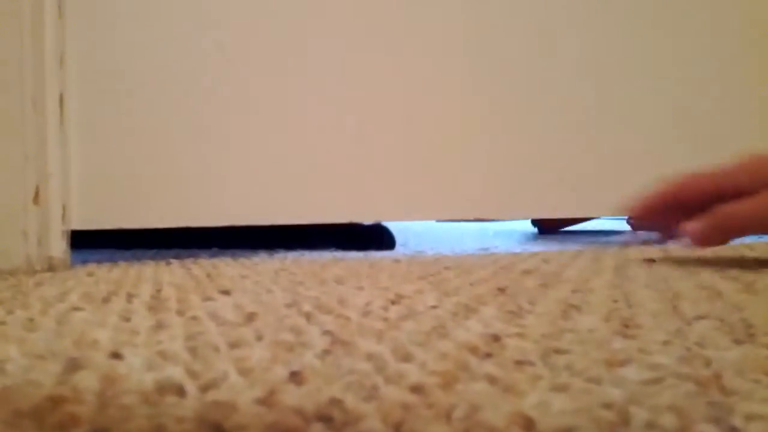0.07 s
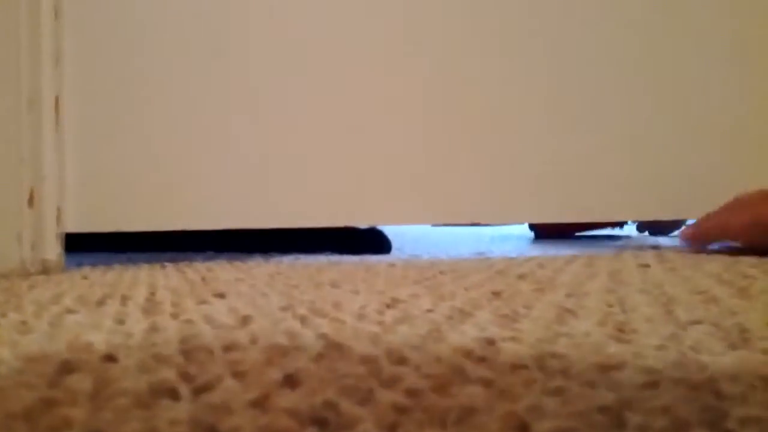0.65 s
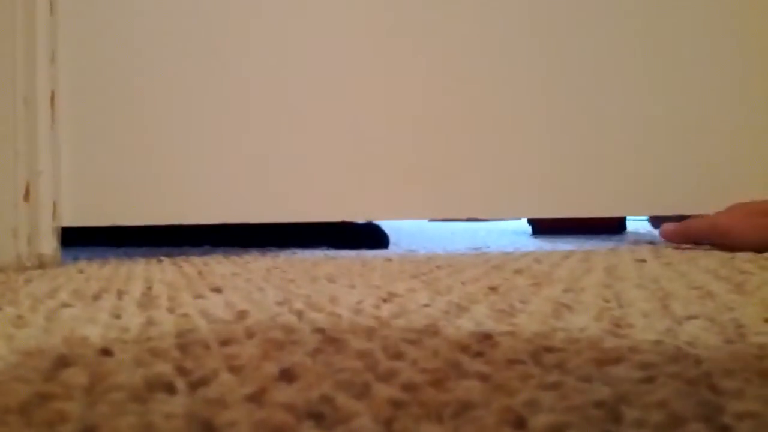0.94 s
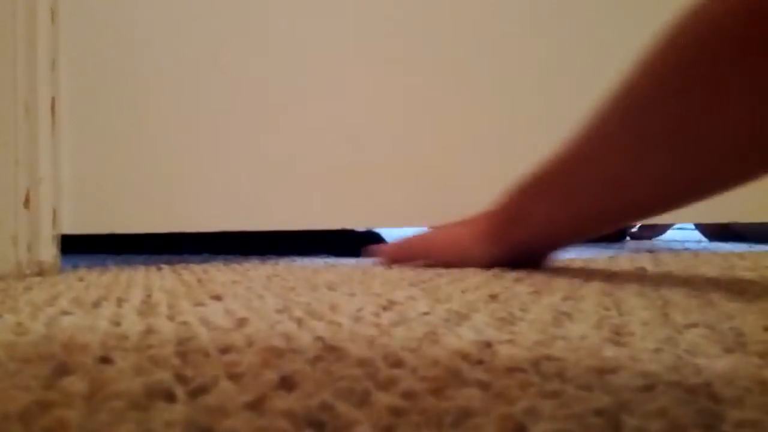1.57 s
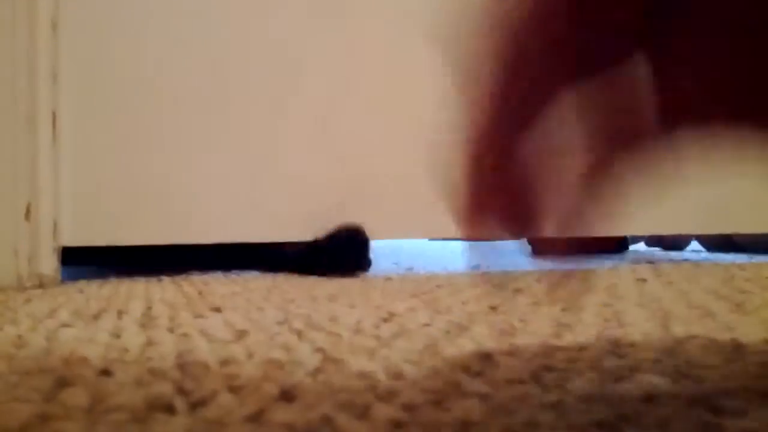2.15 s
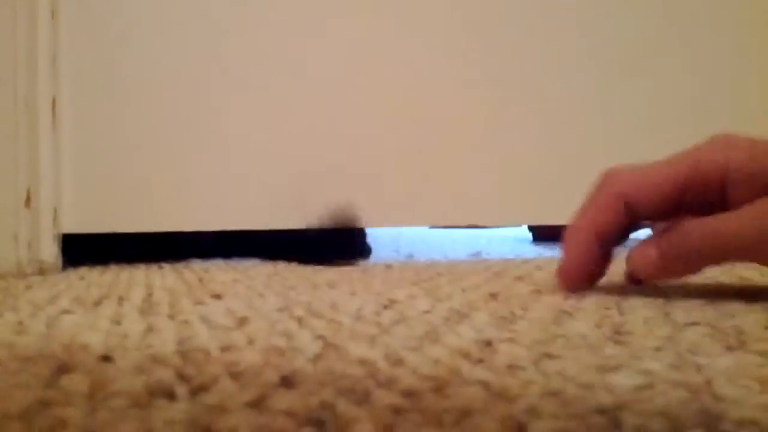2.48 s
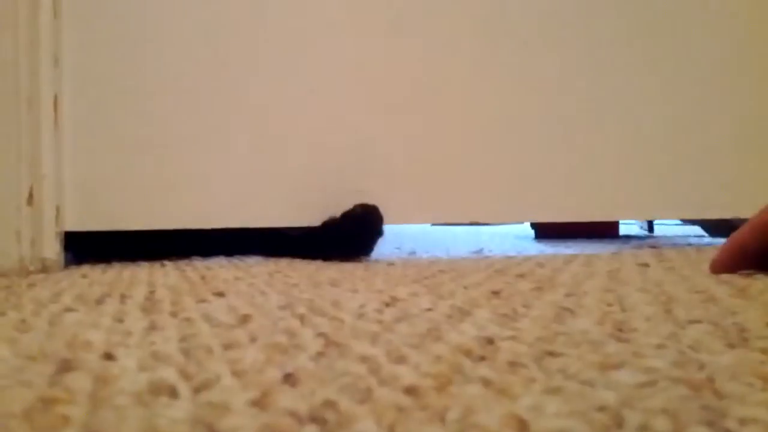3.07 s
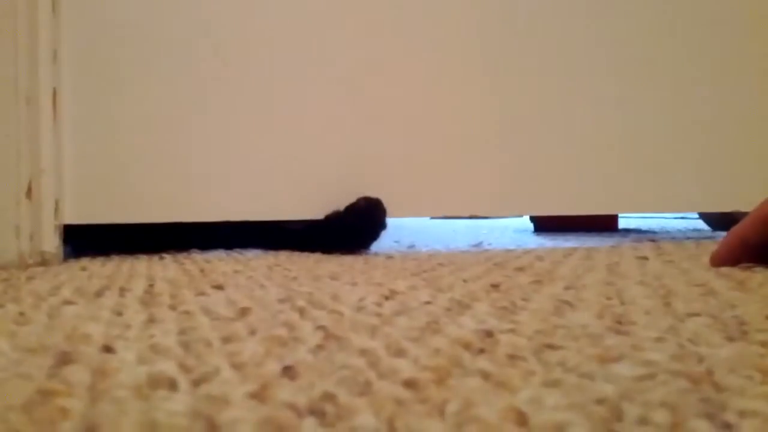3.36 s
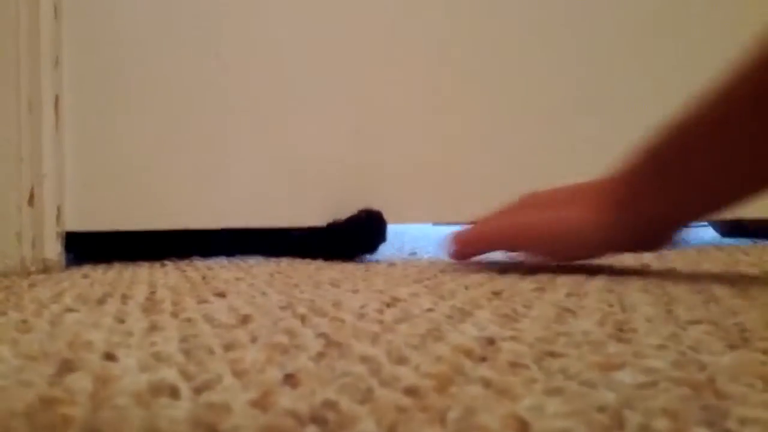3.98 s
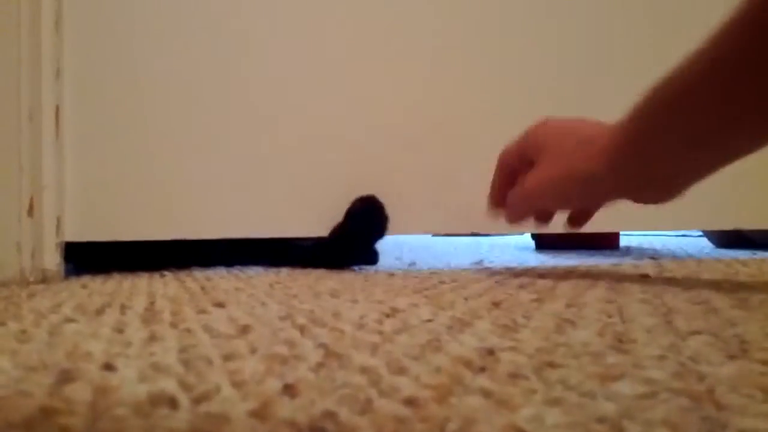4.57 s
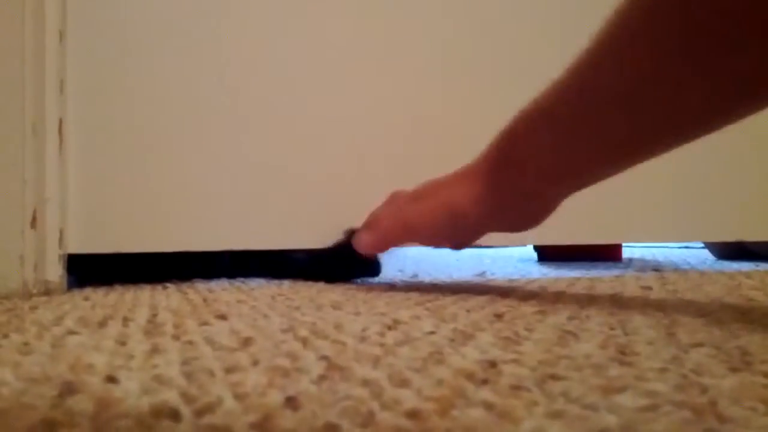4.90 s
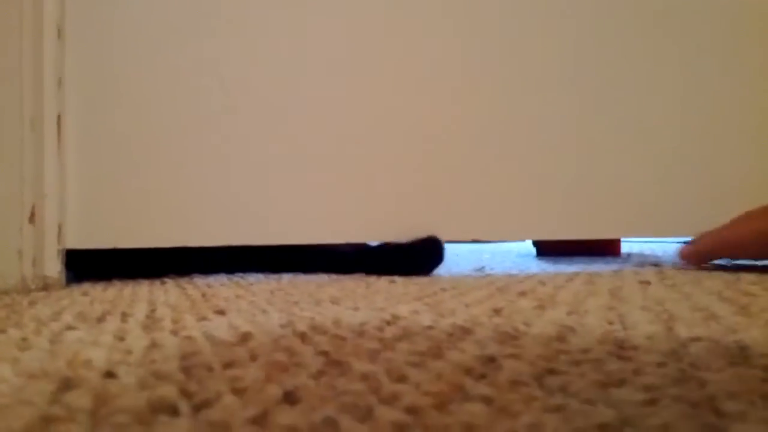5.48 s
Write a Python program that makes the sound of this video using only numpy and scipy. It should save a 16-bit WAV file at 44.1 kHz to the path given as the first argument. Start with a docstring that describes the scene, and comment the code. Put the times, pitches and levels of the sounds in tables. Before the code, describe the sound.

A door rattles briefly, then a hand pats and brushes carpet while a cat's paw scuffs the door and claws pluck the pile.

```python
"""A closed door bumps and rattles in its latch, heard from the carpet close by: a hand is teasing a cat
that reaches under it. The hand pats the padded floor into soft thuds and strokes the pile, whose fibres
snap back in a rustle. Claws pluck and tick, and a paw scuffs the door's edge by stick-slip friction.
Faint hollow tones come and go, and movements rumble through the floor over a hum and microphone hiss."""
import sys
import numpy as np
from scipy import signal
from scipy.fft import rfft, irfft, next_fast_len
from scipy.io import wavfile

SR = 44100
rng = np.random.default_rng(int(sys.argv[2]) if len(sys.argv) > 2 else 0)


def digitize_waveform(pressure):
    """Quantize a signal to 16-bit integers and store it at the path in sys.argv[1].

    Rows of a 2-D input are taken as channels; values are limited to [-1, 1].
    """
    field = np.atleast_2d(pressure).T
    bounded = np.clip(field, -1, 1)
    quanta = np.round(bounded * 32767).astype(np.int16)
    wavfile.write(sys.argv[1], SR, quanta)


N = 253134
TIME = np.arange(N) / SR


# bumps of the door in its latch: start_s, strength_db, rattle_db
DOOR_BUMPS = [(0.0005, -31, -39.5), (0.0131, -31, -74), (0.0291, -27, -68), (0.0406, -18.5, -34),
              (0.0478, -22.5, -47.5), (0.0523, -25, -50), (0.0738, -23, -58), (0.1767, -28.5, -39),
              (0.1885, -26, -52), (0.215, -43, -79), (0.2513, -32, -53), (0.2788, -30, -48.5),
              (0.3272, -38, -57)]
# modes of the door panel: pitch_hz, gain_db, t60_s
PANEL_MODES = [(176.5, -20.5, 0.44), (198, -38, 0.42), (255.8, -3.5, 0.14), (280.6, -3.5, 0.32),
               (325, -10.5, 0.15), (395.6, -17.5, 0.26), (436.2, -11, 0.18), (456, -17, 0.25),
               (520, -24.5, 0.51), (672, -24.5, 0.27), (750, -28, 0.26), (856, -31, 0.2)]
# spectrum of the latch's rattle: frequency_hz, density_db
RATTLE_SPECTRUM = [(330, -1.5), (450, 13), (650, 3), (880, -6), (1050, -8), (1400, -10.5), (2400, -8),
                   (3000, -18), (5400, -30.5), (8000, -18.5), (12500, -21.5), (15000, -44)]

def door_bumps():
    """Impact excitation: each bump rings the panel's modes and makes the latch rattle."""
    blows = sum(click(s, db) for s, db, _ in DOOR_BUMPS)
    shaking = sum(amp(db) * burst(s, t60=0.21, rise_s=0.00065) for s, _, db in DOOR_BUMPS)
    panel = highpass(-ring(lowpass(blows, hz=600), PANEL_MODES), hz=205, order=4)
    rattle = shaking * wood_friction(RATTLE_SPECTRUM, hollow_db=-2)
    return room(panel, wet_db=-14) + rattle


# pats, dull knocks and footfalls, each with its own pitch: start_s, strength_db, pitch_hz, t60_s, slap_db
CARPET_PATS = [(0.6001, -33, 103, 0.041, -25), (0.631, -36.5, 152, 0.081, -25),
               (0.675, -36, 110, 0.026, -20), (0.859, -41, 148, 0.085, -14), (1.026, -43.5, 170, 0.13, -14),
               (1.036, -46, 560, 0.18, 2), (1.4619, -10, 304, 0.023, -4.5), (1.4767, -35.5, 316, 0.05, -15),
               (1.4828, -31.5, 242, 0.084, -11), (1.521, -33, 290, 0.033, -25),
               (2.179, -38, 219, 0.065, -24), (2.7927, -35, 430, 0.12, -17),
               (2.8077, -38.5, 307, 0.095, -13), (2.931, -40, 175, 0.032, -30),
               (4.1908, -38, 208, 0.12, -18), (4.221, -40.5, 225, 0.15, -8),
               (4.236, -35.5, 125, 0.062, -22), (4.255, -31, 56.5, 0.15, -20), (4.296, -43, 90, 0.03, -25),
               (5.4461, -30.5, 192, 0.13, -1), (5.458, -39.5, 282, 0.11, -23), (5.501, -46, 122, .07, -14),
               (5.578, -36, 60, 0.14, -22), (5.606, -39, 85, 0.13, -24)]
# overtones of a slap, relative to its thud: pitch_ratio, gain_db, t60_ratio
SLAP_OVERTONES = [(2.05, -13.5, 1), (3.1, -6, 0.25), (5.5, -28, 0.89)]

def carpet_pats():
    """Damped oscillation: a pat bounces the padded floor; a flat contact adds a slap of overtones."""
    out = np.zeros(N)
    for s, db, hz, t60, slap_db in CARPET_PATS:
        overtones = [(hz * pitch_ratio, slap_db + gain_db, t60 * t60_ratio)
                     for pitch_ratio, gain_db, t60_ratio in SLAP_OVERTONES]
        bounce = ring(click(s, db), [(hz, 0, t60)] + overtones)
        out -= highpass(bounce, hz=0.53 * hz)   # the floor springs back: little sounds below the thud
    return room(lowpass(out, hz=1500, order=3), wet_db=-12)


# the palm slides toward the door, presses down and lifts: time_s, brush_db, scrape_db
PALM_STROKE = [(1.13, -72.5, -64.5), (1.24, -63, -65), (1.42, -61.5, -68), (1.55, -56, -57),
               (1.8, -53.5, -54), (1.858, -51.5, -55.5), (1.885, -51, -42.5), (1.915, -50.5, -38.5),
               (1.97, -63.5, -56)]
# swipes of hand or paw over the pile: peak_s, length_s, brush_db, scrape_db
PILE_SWIPES = [(0.554, 0.77, -77, -69), (2.198, 0.14, -71, -60), (2.31, 0.27, -70.5, -56.5),
               (2.461, 0.18, -61.5, -60), (2.725, 0.54, -86, -59), (2.878, 0.19, -65, -62),
               (3.684, 0.11, -62, -68), (3.955, 0.055, -65.5, -58), (4.067, 0.12, -70.5, -69),
               (4.77, 0.12, -65.5, -66), (5.45, 1.3, -74, -67)]

def pile_contact():
    """Incoherent addition: stroke and swipes sum in power, giving a brushing and a scraping envelope."""
    times, *levels = np.transpose(PALM_STROKE)
    palm_db = np.array([np.interp(TIME, times, level) for level in levels])
    beyond_s = np.abs(TIME - np.clip(TIME, times[0], times[-1]))
    palm = amp(palm_db - 200 * beyond_s)   # fades 200 dB/s beyond either end
    swipes = [amp([[brush_db], [scrape_db]]) * swell(s, length_s)
              for s, length_s, brush_db, scrape_db in PILE_SWIPES]
    return np.sqrt(palm ** 2 + sum(swipe ** 2 for swipe in swipes))


# spectra of brushed tips, dragged loops and raking fingernails: frequency_hz, density_db
BRUSH_SPECTRUM = [(300, -7), (700, -4.5), (1500, -2.5), (2300, 1), (2900, -2), (3700, -1.5), (4600, -6.5),
                  (6000, -10), (11000, -17), (16000, -31)]
SCRAPE_SPECTRUM = [(70, -9.5), (180, 7), (350, 1.5), (650, -3), (1100, -13.5), (2500, -37), (5000, -25.5),
                   (9000, -20.5), (12500, -17), (16000, -26.5)]
NAIL_SPECTRUM = [(200, 7.5), (600, -7), (1300, -2), (2400, -0.5), (4200, -3), (6000, -9), (11000, -10),
                 (15500, -16)]

def carpet_strokes():
    """Sliding friction: a light touch brushes fibre tips, pressure drags loops, and nails rake once."""
    brushing, scraping = pile_contact()
    catching = rms_one(lowpass(rng.standard_normal(N), hz=29.8))   # the hand catches on rows of loops
    grip = amp(1.1 * catching)   # 1.1 dB rms
    tips = brushing * coloured(fibres(per_s=9000, spread_db=3), BRUSH_SPECTRUM)
    loops = scraping * coloured(fibres(per_s=8300, spread_db=4.5), SCRAPE_SPECTRUM)
    rake = amp(-42.5) * swell(peak_s=2.242, length_s=0.056)
    nails = rake * coloured(fibres(per_s=2600, spread_db=3), NAIL_SPECTRUM)
    # the palm whisks off the ribbed pile with a short, narrow rasp
    rasp_hz, rasp_t60_s = 3080, 0.0021
    rasp = ring(fibres(per_s=9000, spread_db=0), [(rasp_hz, 0, rasp_t60_s)])
    whisk = amp(-49.5) * swell(peak_s=1.853, length_s=0.095) * rms_one(highpass(rasp, hz=1800))
    return grip * (tips + loops + whisk) + nails


# a paw scuffs the door's edge: start_s, strength_db, t60_s, cutoff_hz
PAW_SCUFFS = [(0.772, -47.5, 0.19, 6000), (1.033, -43.5, 0.2, 1050), (2.774, -46, 0.095, 4000),
              (2.791, -37, 0.21, 3950), (2.798, -38, 0.034, 4500), (2.807, -39.5, 0.22, 497),
              (2.854, -40.5, 0.063, 4000), (3.413, -50.5, 0.23, 4000), (3.481, -52.5, 0.4, 6000),
              (4.187, -45, 0.32, 600), (5.402, -45.5, 0.18, 1500), (5.4465, -40, 0.14, 450)]
# fur rubs softly along the wood: peak_s, length_s, strength_db
FUR_RUBS = [(0.38, 0.74, -58.5), (2.733, 0.42, -60.5), (3.113, 0.21, -64), (3.78, 0.5, -65.5),
            (4.124, 0.18, -64.5), (4.462, 0.13, -61.5), (4.93, 0.18, -66), (5.29, 0.31, -67),
            (5.72, 0.12, -62.5)]
# spectrum of dry friction on the door's edge: frequency_hz, density_db
SCUFF_SPECTRUM = [(100, -30), (200, -5.5), (400, 0), (800, -10), (1100, -14), (2600, -12), (3400, -23.5),
                  (11500, -17), (15000, -13.5)]

def paw_scuffs():
    """Stick-slip friction: the paw catches on the wood in short runs and rubs along it in between."""
    wood = wood_friction(SCUFF_SPECTRUM, hollow_db=-2.5)
    rubbing = sum(amp(db) * swell(s, length_s) for s, length_s, db in FUR_RUBS)
    runs = sum(lowpass(wood * amp(db) * burst(s, t60, rise_s=0.0036), hz, order=1)
               for s, db, t60, hz in PAW_SCUFFS)
    return runs + lowpass(wood * rubbing, hz=2950, order=1)


# modes of rubbed wood: pitch_hz, gain_db, t60_s
WOOD_MODES = [(290, 0.5, 0.065), (372, -4, 0.061), (424.4, 0, 0.059), (541.5, -8.5, .1), (610, -6, 0.049),
              (846, -6, 0.058), (1330, -4, 0.022), (1402, -14, 0.13), (1564, -4, 0.026),
              (1762, -11.5, 0.048), (2038, -11, 0.044), (2374, -11, 0.024), (2640, -19, 0.099)]

def wood_friction(spectrum, hollow_db):
    """Frictional excitation: tiny slips sound as dry grains and ring the wood's modes; rms 1."""
    grains = coloured(fibres(per_s=3000, spread_db=3), spectrum)
    hollow = rms_one(highpass(ring(fibres(per_s=2000, spread_db=2), WOOD_MODES), hz=225))
    return rms_one(grains + amp(hollow_db) * hollow)


# claws rip free of carpet loops: start_s, strength_db, t60_s
LOOP_PLUCKS = [(0.642, -52, 0.047), (2.0735, -34.5, 0.032), (2.084, -45.5, .14), (2.3398, -36, 0.048),
               (2.351, -44.5, 0.14), (3.483, -54.5, 0.22)]
# claws pick through the pile: peak_s, length_s, strength_db
PICKING_RUNS = [(0.633, 0.025, -56), (0.725, 0.17, -61.5), (4.096, 0.1, -60), (5.549, 0.082, -60)]
# spectrum of a released loop's crackle: frequency_hz, density_db
PLUCK_SPECTRUM = [(600, -24), (1350, -6), (2000, -12.5), (4800, -12), (6500, -8), (8200, -2), (11000, -4),
                  (15500, -10.5)]

def claw_plucks():
    """Sudden release of tension: freed loops spray fine crackle, singly or in runs of tiny snaps."""
    spray = coloured(fibres(per_s=11000, spread_db=6), PLUCK_SPECTRUM)
    plucks = sum(amp(db) * burst(s, t60, rise_s=0.00038) for s, db, t60 in LOOP_PLUCKS)
    releases = np.abs(fibres(per_s=140, spread_db=1))
    snaps = rms_one(signal.lfilter([1], [1, -decay_per_sample(t60=0.013)], releases + 1e-18))
    runs = snaps * sum(amp(db) * swell(s, length_s) for s, length_s, db in PICKING_RUNS)
    return lowpass(spray * (plucks + runs), hz=14500, order=3)


# single taps of a claw tip: start_s, strength_db
CLAW_TAPS = [(0.1912, -49.5), (0.816, -40), (1.812, -47.5), (2.918, -54), (3.312, -46.5), (4.8652, -49.5),
             (5.138, -55), (5.611, -52.5)]
# modes of a claw's tick: pitch_hz, gain_db, t60_s
CLAW_MODES = [(5000, -9, 0.0033), (8700, 5, 0.00067), (10720, 4.5, 0.0046), (10650, 0.5, 0.0021),
              (13400, -37, .003)]

def claw_ticks():
    """Impulse response: a tapping claw tip rings high modes that die within milliseconds."""
    taps = sum(click(s, db) for s, db in CLAW_TAPS)
    return highpass(ring(taps, CLAW_MODES), hz=6000)


# shifts of weight shake the floor: start_s, level_db
WEIGHT_SHIFTS = [(0.59, -44), (0.88, -51.5), (1.11, -46.5), (1.85, -52.5), (2.08, -47.5), (2.43, -55),
                 (4.16, -43), (4.29, -49.5), (5.47, -46), (5.7, -45)]
# spectrum of the floor's vibration: frequency_hz, density_db
RUMBLE_SPECTRUM = [(20, -17), (37, 4), (60, -1), (95, -1.5), (140, -14.5), (220, -11), (330, -31),
                   (700, -49.5)]

def floor_rumble():
    """Structure-borne sound: the floor carries shifts of weight to the microphone lying on it."""
    resting_power = amp(-63) ** 2
    moving_power = sum((amp(db) * burst(s, t60=1, rise_s=0.016)) ** 2 for s, db in WEIGHT_SHIFTS)
    return np.sqrt(resting_power + moving_power) * coloured(rng.standard_normal(N), RUMBLE_SPECTRUM)


# faint hollow tones: peak_s, half_length_s, pitch_hz, level_db
HOLLOW_TONES = [(3.524, 0.022, 1290, -65.5), (3.886, 0.073, 760, -70), (4.475, 0.11, 542, -70),
                (4.936, 0.016, 1330, -70), (5.236, 0.064, 1310, -70.5), (5.341, 0.019, 545, -61.5),
                (5.419, 0.017, 610, -54.5), (5.557, .045, 767, -67)]

def hollow_tones(t60=0.04):
    """Narrow-band resonance: noise drives one mode for each tone, which swells softly and fades."""
    out = np.zeros(N)
    for peak_s, half_length_s, hz, db in HOLLOW_TONES:
        tone = rms_one(ring(rng.standard_normal(N), [(hz, 0, t60)]))
        out += amp(db) * tone / (1 + ((TIME - peak_s) / half_length_s) ** 4)
    return out


# partials of a distant appliance's hum: pitch_hz, rms_db
HUM_PARTIALS = [(59.6, -64.5), (119, -70), (301.5, -79), (430.7, -94)]
# spectrum of the microphone's hiss: frequency_hz, density_db
HISS_SPECTRUM = [(20, -4), (40, -3.5), (72, -11.5), (123, -11.5), (170, -36), (300, -20), (620, -19.5),
                 (1100, -27.5), (2800, -30.5), (6200, -31), (8000, -29), (11900, -24), (16000, -32.5)]

def hum_and_hiss():
    """Noise floor: an appliance's steady partials lie over the microphone's broadband self-noise."""
    hum = sum(amp(db) * np.sqrt(2) * np.sin(2 * np.pi * (hz * TIME + rng.random()))
              for hz, db in HUM_PARTIALS)
    return hum + amp(-64) * coloured(rng.standard_normal(N), HISS_SPECTRUM)


def room(x, wet_db):
    """Reverberation: the diffuse reflections of a small room follow a few milliseconds late."""
    tail = rng.standard_normal(N) * burst(0.0033, t60=0.29, rise_s=0.0014)
    response = tail[:SR // 2] / np.sqrt(np.sum(tail ** 2))
    return x + amp(wet_db) * signal.fftconvolve(x, response)[:N]


def ring(x, modes):
    """Modal superposition: a unit impulse starts each mode as a damped sine at its own level."""
    out = np.zeros(N)
    for hz, db, t60 in modes:
        radius, angle = decay_per_sample(t60), 2 * np.pi * hz / SR
        feedback = [1, -2 * radius * np.cos(angle), radius ** 2]
        out += amp(db) * signal.lfilter([0, np.sin(angle)], feedback, x + 1e-18)
    return out


def fibres(per_s, spread_db):
    """Shot noise: fibres snap back at random moments, with uneven strength."""
    sizes = amp(spread_db * np.minimum(rng.exponential(1, N), 4)) * rng.choice([-1, 1], N)
    return sizes * (rng.random(N) < per_s / SR)


def coloured(x, spectrum):
    """Spectral shaping: a steady excitation takes on a spectrum's relative levels; rms 1."""
    size = next_fast_len(N)
    hz, db = np.transpose(spectrum)
    bins_hz = np.maximum(np.fft.rfftfreq(size, 1 / SR), 1)
    gain = amp(np.interp(np.log(bins_hz), np.log(hz), db)) * (bins_hz > 10)
    return rms_one(irfft(rfft(x, size) * gain, size)[:N])


def click(start_s, db):
    """An ideal impact: one impulse."""
    return amp(db) * (np.arange(N) == max(round(start_s * SR), 0))


def burst(start_s, t60, rise_s):
    """A transient's envelope: quick rise, exponential decay."""
    age = np.maximum(TIME - start_s, 0)
    return (1 - np.exp(-age / rise_s)) * np.exp(-np.minimum(np.log(1000) * age / t60, 100))


def swell(peak_s, length_s, edge_db=13.5):
    """A Gaussian envelope: a sliding contact speeds up and slows, edge_db down at either end."""
    return amp(-np.minimum(edge_db * (2 * (TIME - peak_s) / length_s) ** 2, 200))


def lowpass(x, hz, order=2):
    """Treble roll-off, as from a soft contact."""
    return signal.sosfilt(signal.butter(order, hz, fs=SR, output="sos"), x + 1e-18)


def highpass(x, hz, order=2):
    """Bass roll-off, as from a small radiating surface."""
    return signal.sosfilt(signal.butter(order, hz, "high", fs=SR, output="sos"), x + 1e-18)


def decay_per_sample(t60):
    """Exponential damping: the factor that loses 60 dB in t60 seconds."""
    return np.exp(-np.log(1000) / (t60 * SR))


def amp(db):
    """Decibels to gain."""
    return 10 ** (np.asarray(db) / 20)


def rms_one(x):
    """Normalisation to an rms of 1."""
    return x / np.sqrt(np.mean(x ** 2) + 1e-20)


def scene():
    """Superposition: all sources add at one microphone."""
    contacts = door_bumps() + carpet_pats() + paw_scuffs() + claw_plucks() + claw_ticks()
    return (contacts + carpet_strokes() + hollow_tones() + floor_rumble() + hum_and_hiss())[None]


def record(dry):
    """Band limiting: a steep low-pass cuts the treble above 15.9 kHz."""
    return signal.sosfilt(signal.ellip(10, .1, 70, 15900, fs=SR, output="sos"), dry)


dry = scene()
out = record(dry)
digitize_waveform(out)
```